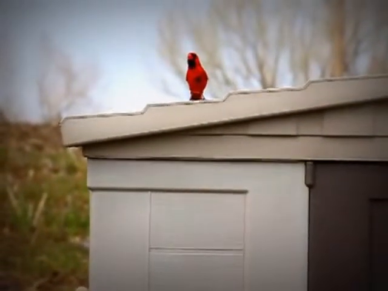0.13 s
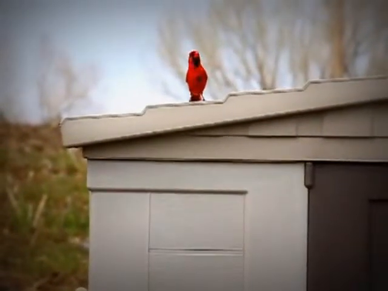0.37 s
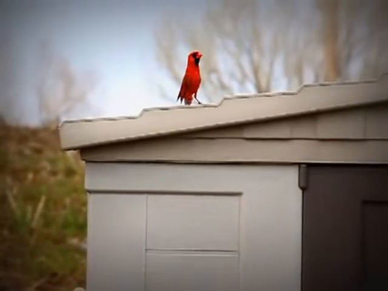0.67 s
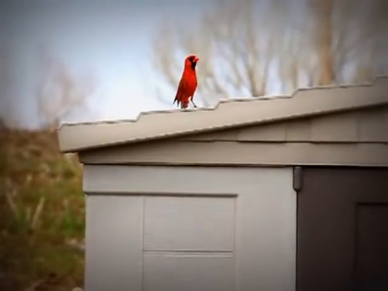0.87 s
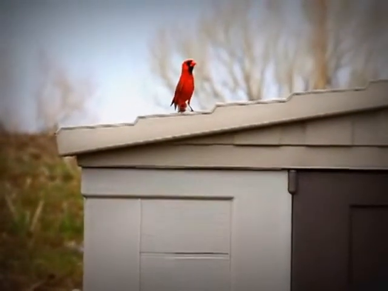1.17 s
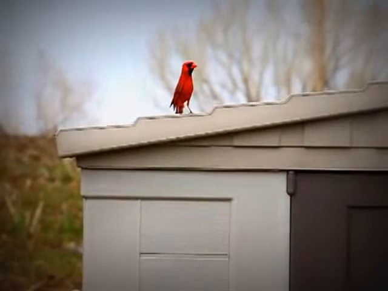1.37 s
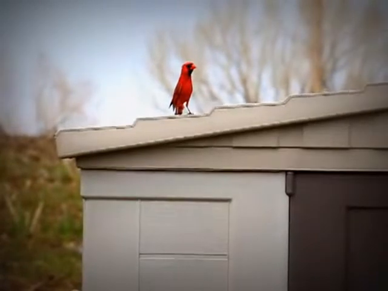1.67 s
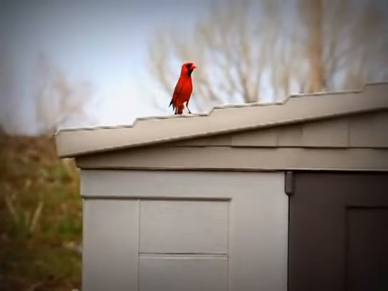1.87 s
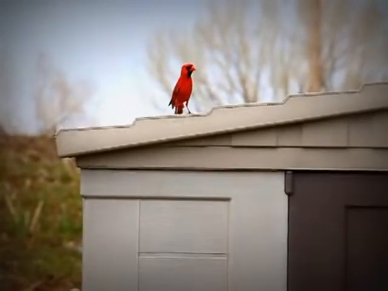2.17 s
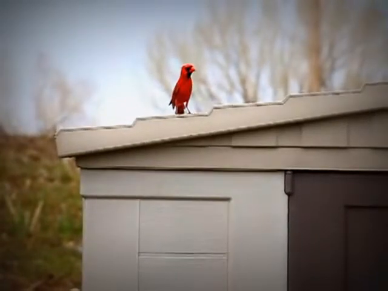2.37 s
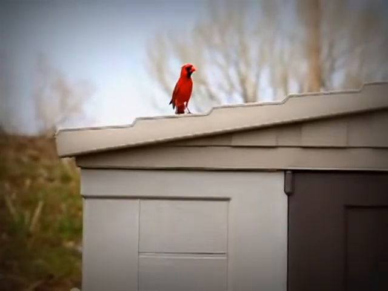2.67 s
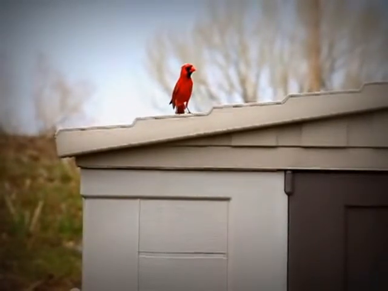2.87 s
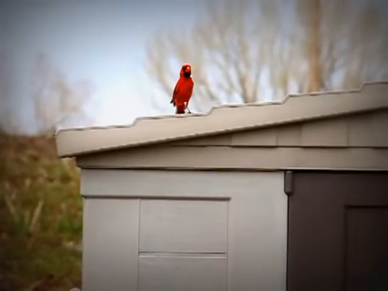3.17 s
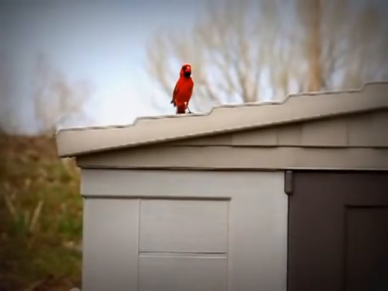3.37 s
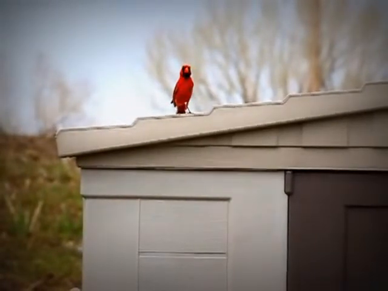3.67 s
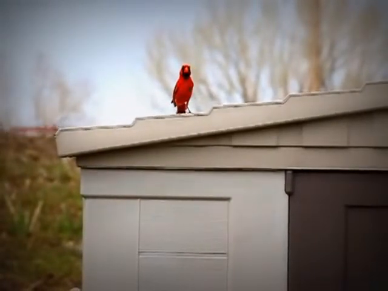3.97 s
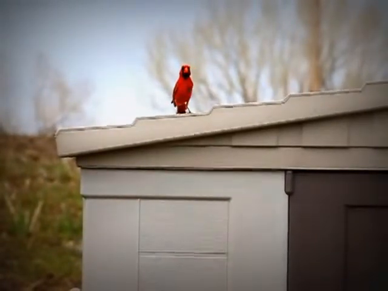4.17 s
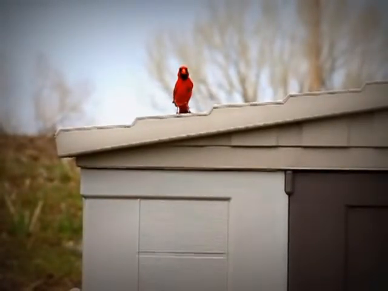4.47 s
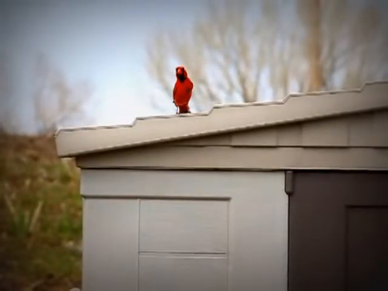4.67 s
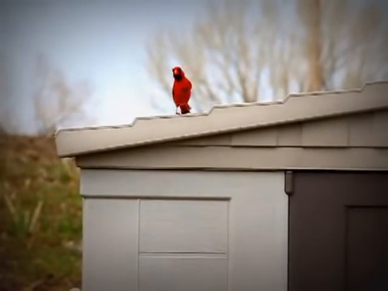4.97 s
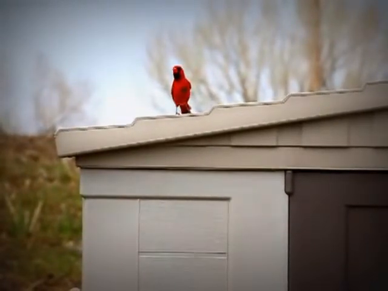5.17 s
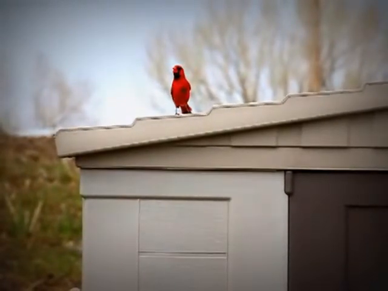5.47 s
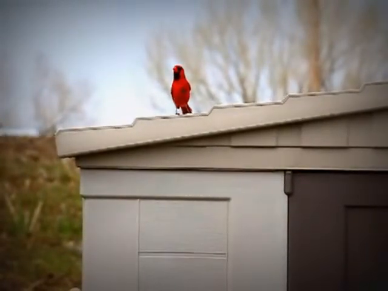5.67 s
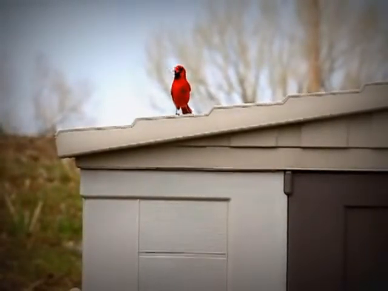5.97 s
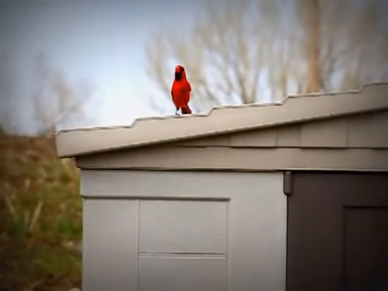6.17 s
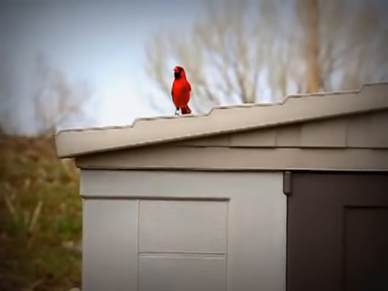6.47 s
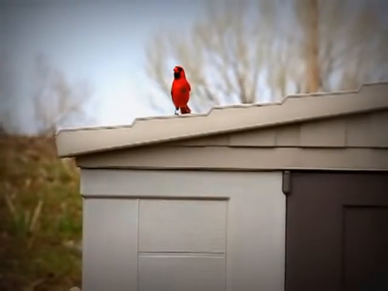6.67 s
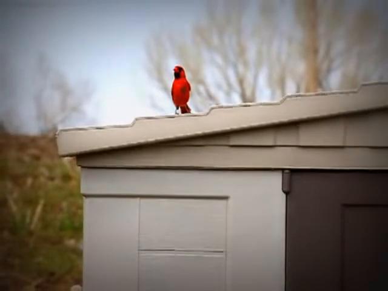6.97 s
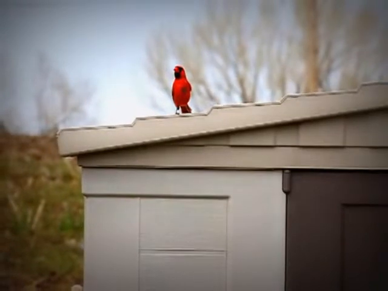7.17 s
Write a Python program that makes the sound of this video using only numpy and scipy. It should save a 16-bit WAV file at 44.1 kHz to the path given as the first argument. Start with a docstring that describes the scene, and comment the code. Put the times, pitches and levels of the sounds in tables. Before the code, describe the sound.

In a rural yard, a cardinal sings two phrases of sharp, falling whistles several seconds apart, close to the microphone and thrown back lightly by nearby walls. Scratchy sparrow chirps and a few mellow robin warbles come from further away. A faraway truck rumbles low throughout, growing louder midway as it accelerates, while a soft wash of road noise builds over the still air.

```python
"""Cardinal in a rural yard

A cardinal whistles from a shed roof: a low arch, a quick rise and a steep down-slur, over and over.
The shed and nearby walls throw the notes back. Further off, sparrows chirp, a robin warbles and a thin
bird buzzes, each note a gliding near sine from the syrinx. A distant truck pulls away through two gear
changes, its exhaust droning with the revs, while road noise slowly swells over still air and a faint hum."""
import sys
import numpy as np
from scipy import signal
from scipy.io import wavfile
from scipy.ndimage import uniform_filter1d

SR = 44100
rng = np.random.default_rng(int(sys.argv[2]) if len(sys.argv) > 2 else 0)


def persist_wave(psi):
    """Save psi, clipped to +-1, as 16-bit WAV."""
    counts = np.round(np.clip(psi, -1, 1) * 32767).astype(np.int16)
    wavfile.write(sys.argv[1], SR, np.atleast_2d(counts).T)


N = 323253
TIME = np.arange(N) / SR


def amp(db):
    return 10 ** (np.asarray(db) / 20)


def unit_rms(x):
    return x / np.sqrt(np.mean(x ** 2) + 1e-20)


def automation(points):
    """A curve of (time, value) points, drawn over the whole scene."""
    return np.interp(TIME, *np.transpose(points))


def curve_at(points, hz):
    """A curve of (frequency, value) points, joined by straight lines on a log-frequency axis."""
    point_hz, value = np.transpose(points)
    return np.interp(np.log(hz + 1), np.log(point_hz), value)


def add(mix, s, sound):
    """Lays a sound into the mix at s seconds."""
    start = round(s * SR)
    sound = sound[max(-start, 0):]
    part = mix[max(start, 0):][:len(sound)]
    part += sound[:len(part)]


def drift(t, rate_hz):
    """Smooth random modulation of rms about 1, moving no faster than the given rate."""
    hz = np.geomspace(rate_hz / 10, rate_hz, 20)[:, None]
    return np.sin(2 * np.pi * (hz * t + rng.random(hz.shape))).sum(0) / np.sqrt(10)


def wander(rate_hz):
    """A slow drift that lasts the whole scene."""
    coarse_time = TIME[::200]
    return np.interp(TIME, coarse_time, drift(coarse_time, rate_hz))


def noise(colour, patchy_db):
    """Coloured noise of rms 1, with drifting patches in time and frequency."""
    hz = np.fft.rfftfreq(2048, 1 / SR)
    real, imag, patches = rng.standard_normal((3, N // 512 + 5, len(hz)))
    patches = uniform_filter1d(patches, size=7, axis=0)
    patches = unit_rms(uniform_filter1d(patches, size=20, axis=1))
    frames = (real + 1j * imag) * amp(curve_at(colour, hz) + patchy_db * patches)
    return unit_rms(signal.istft(frames.T, nperseg=2048, noverlap=1536)[1][:N])


def note(name, db, pitch, length, overtones_db, waver, waver_hz):
    """The syrinx glides along one contour as a near sine; throat and beak colour its weak overtones."""
    # each kind of note, before transposing and stretching: (time [s], pitch [Hz], level [dB])
    contours = { "arch": [(0, 1810, -13), (.012, 1986, -8.5), (.028, 2130, 0.5), (.044, 2220, -0.5),
                (.058, 2116, 1), (.07, 1817, -4), (.088, 1650, -12), (.1, 1690, -5.5)],
                "rise": [(0, 2150, -43), (.003, 2810, 1), (.007, 3320, 1), (.012, 3820, 1),
                (.017, 3610, -1.5), (.021, 3140, -20), (.025, 2600, -28)], "slur": [(0, 7500, -20),
                (.002, 6700, -11.5), (.0045, 5250, -4), (.007, 4330, 1.5), (.011, 4150, 0.5),
                (.018, 4170, -2.5), (.026, 4150, -4.5), (.031, 4080, -22)], "fall": [(0, 2820, -33),
                (.004, 2655, 8), (.018, 2517, 2.5), (.032, 2164, 1.5), (.044, 2060, -6), (.055, 2030, -25)],
                "warble": [(0, 2975, -5), (.015, 2840, 3), (.06, 1900, -3), (.078, 2080, -2.5),
                (.12, 3005, 3.5), (.17, 1920, 4), (.192, 2020, -2), (.22, 2724, 1.5), (.235, 2700, -14)],
                "hook": [(0, 1900, -24), (.005, 2920, -5.5), (.011, 3370, -10), (.03, 3350, -11),
                (.042, 3240, 0), (.049, 2685, -1), (.057, 3030, -3), (.064, 2680, -1), (.068, 2500, -12)],
                "level": [(0, 1956, -14), (.008, 2018, -0.5), (.032, 2082, 4), (.052, 1930, -7),
                (.066, 1780, -16)], "swoop": [(0, 2070, -5), (.015, 2643, 1), (.03, 2950, 6),
                (.055, 2730, -3), (.075, 2586, -2.5), (.115, 2500, -6), (.145, 2660, -4), (.17, 2560, -9)],
                "glide": [(0, 3300, 3), (.006, 3110, 2.5), (.022, 2446, -6), (.045, 2256, 1.5),
                (.062, 2260, -2), (.072, 2273, -23)], "chirp": [(0, 3900, -18), (.012, 4250, -3),
                (.022, 4680, 0), (.04, 4740, 1), (.055, 4680, 0), (.061, 3800, 0), (.07, 3400, -7),
                (.079, 3900, -4), (.088, 3300, -15)], "overvoice": [(0, 4720, 8), (.006, 5260, 1),
                (.03, 5310, 1.5), (.04, 5100, 3), (.046, 4600, -16)], "scratch": [(0, 3400, -1),
                (.01, 4300, 2.5), (.017, 5000, 2.5), (.023, 3900, 2.5), (.031, 4500, -5.5),
                (.045, 3830, 4.5), (.058, 3760, -24)], "dip": [(0, 3260, -18), (.007, 3470, 4),
                (.014, 3410, 2), (.021, 2795, 0.5), (.028, 2836, -2), (.033, 2950, -18)],
                "hold": [(0, 3400, -2), (.01, 3380, -1), (.028, 3350, 3), (.04, 3180, -4), (.05, 2850, -2),
                (.058, 2900, -18)], "pip": [(0, 5320, -18), (.003, 4800, -1), (.007, 4565, 6),
                (.02, 4556, 0.5), (.028, 4520, -14), (.033, 4460, -26)], "lift": [(0, 2315, -8),
                (.02, 2520, -2.5), (.045, 2706, 3.5), (.062, 2560, -6), (.078, 1980, 2), (.086, 1895, -23)],
                "buzz": [(0, 6830, -18), (.01, 6750, 3), (.035, 6630, -8), (.06, 6650, -0.5),
                (.08, 6600, -11)], "peep": [(0, 3940, 1), (.008, 4470, 1.5), (.02, 4530, 0),
                (.032, 4300, -5.5), (.042, 3660, 1.5)], }
    # the syrinx's overtones: (harmonic number, level [dB])
    overtones = [(2, -18), (3, -18), (4, -10), (5, -24), (6, -18.5), (7, -25)]
    # throat and beak resonances: (frequency [Hz], gain [dB])
    beak = [(3000, -9), (4400, 0), (6400, -18), (7600, -8), (8700, -3), (10300, -9), (12400, -3.5),
            (14000, -21), (16000, -14)]
    s, contour_hz, contour_db = np.transpose(contours[name])
    t = np.arange(0, s[-1] * length, 1 / SR)
    hz = uniform_filter1d(np.interp(t, s * length, contour_hz), size=110) * pitch
    hz *= 1 + waver * drift(t, waver_hz)
    phase = 2 * np.pi * np.cumsum(hz) / SR
    upper = sum(amp(k_db + curve_at(beak, k * hz)) * (k * hz < SR / 2) * np.sin(k * phase)
                for k, k_db in overtones)
    envelope = amp(db + np.interp(t, s * length, contour_db)) * signal.windows.tukey(len(t), .04)
    return np.sqrt(2) * envelope * (np.sin(phase) + amp(overtones_db) * upper)


def sing(song, waver, waver_hz):
    """Plays a list of (time [s], note, level [dB], pitch factor, length factor, overtones [dB])."""
    out = np.zeros(N)
    for s, *syllable in song:
        add(out, s, note(*syllable, waver, waver_hz))
    return out


def walls(x):
    """Distinct early echoes from the ground and buildings."""
    # slap echoes: (delay [s], level [dB])
    echoes = [(0.0171, -9), (0.019, -15), (.022, -21)]
    out = np.zeros(N)
    for delay, db in echoes:
        add(out, delay, amp(db) * x)
    return out


def yard(x, early_db, early_t60):
    """Scatter from grass, fences and trees: a short dense cluster, then a thin long tail."""
    # how long the tail rings: (frequency [Hz], time to fall 60 dB [s])
    tail_t60 = [(1500, .45), (2200, .7), (3000, .55), (4300, .52), (8000, .35), (15000, .25)]
    hz, s, frames = signal.stft(rng.standard_normal(SR), SR, nperseg=256)
    decay = amp(-60 * s / curve_at(tail_t60, hz)[:, None]) + amp(early_db - 60 * s / early_t60)
    fade_in = np.minimum(TIME[:SR] / .004, 1)
    response = signal.istft(frames * decay, SR, nperseg=256)[1][:SR] * fade_in
    return signal.fftconvolve(x, response / np.linalg.norm(response))[:N]


def cardinal():
    """Close, clean whistles with a slap from the walls; each syllable is three notes around a rise."""
    # full syllables of arch, rise and slur: (time of rise [s], arch pitch factor, arch length factor,
    # arch overtones [dB], slur level [dB], pitch factor of rise and slur, slur length factor)
    cheers = [(.066, .97, .93, -2, -21.5, 1.012, 1.1), (.3125, 1, 1, -1, -22.5, 1, 1.05),
              (.5745, .98, 1, .5, -29.5, .99, .75), (5.5815, 1.02, 1, -3.5, -23, 1.043, 1.08),
              (5.8335, 1.01, 1.04, -1, -24.5, 1.02, 1), (6.0845, 1, 1, 1.5, -22.5, .977, .8),
              (6.321, 1.04, .9, 0, -21, .972, .83)]
    # warm-up syllables of fall, higher rise and pip:
    # (time of rise [s], level [dB], fall length factor, overtones of fall and pip [dB])
    openers = [(4.901, -33.5, .85, -11), (5.322, -29.5, 1.03, -7.5)]
    arch_db, rise_db, rise_length, rise_overtones_db = -29, -28, .91, -6
    song = []
    for s, db, fall_length, overtones_db in openers:
        song += [(s - .065 * fall_length, "fall", db, .985, fall_length, overtones_db),
                 (s, "rise", db, 1.062, rise_length, rise_overtones_db),
                 (s + .0295, "pip", db + 2, .993, .76, overtones_db)]
    for s, arch_pitch, arch_length, overtones_db, slur_db, pitch, slur_length in cheers:
        song += [(s - .121 * arch_length, "arch", arch_db, arch_pitch, arch_length, overtones_db),
                 (s, "rise", rise_db, .99 * pitch, rise_length, rise_overtones_db),
                 (s + .0255, "slur", slur_db, pitch, slur_length, -1.5)]
    voice = sing(song, waver=.0022, waver_hz=152)
    return amp(-2.5) * voice + walls(voice) + amp(-8) * yard(voice, early_db=2, early_t60=.13)


def sparrow_notes():
    """The sparrows' calls as two lists of notes, the clear and the rasping."""
    # single peeps: (time [s], level [dB], pitch factor, length factor)
    peeps = [(.25, -46, 1.22, 0.96), (.552, -43.5, 1.25, 1.3), (.948, -44, 1.02, 1.03),
             (1.477, -51, 0.9, 0.78), (1.99, -44, .99, 0.92), (2.04, -51.5, 1.05, 1.3),
             (2.186, -50.5, 0.87, 1.3), (2.233, -43.5, 0.75, 0.96), (2.893, -47, 1.02, 1.1),
             (3.866, -42, 1, .75), (4.378, -35, .76, 1), (4.505, -36.5, 0.86, 1), (5.925, -34, 0.69, 1.05),
             (6.582, -43.5, .97, 0.8)]
    # two-voiced chirps: (time [s], level [dB], pitch factor, length factor, overtones [dB])
    chirps = [(-.012, -30.5, 0.93, 1.04, -8), (2.571, -32, .98, 0.97, -6), (4.392, -27.5, .97, 1.03, -5.5),
              (5.853, -28.5, 0.94, 0.79, -4)]
    # scratches that settle on a lower note: (time [s], level [dB], pitch factor, lisp level [dB],
    # overtones [dB], last note, its level [dB], its pitch factor)
    chirrups = [(0.175, -38, .97, -55, -12, "hold", -40, .91),
                (.793, -40.5, .95, -62, -8, "hold", -38, 0.99),
                (1.64, -39, 1.04, -46, -2, "dip", -34.5, 0.96),
                (2.685, -35, 0.93, -58, -5, "hold", -35, 1.02),
                (3.562, -38, 1.02, -47.5, -1, "dip", -34, .95),
                (6.793, -38, 0.97, -58, -1, "hold", -35, 1.04)]
    # high peeps: (time [s], clear level [dB], raspy level [dB], pitch factor, lisp level [dB])
    tseeps = [(1.408, -45, -54, 1.27, -54), (3.888, -47, -44, 1.21, -51.5),
              (4.945, -53, -35.5, 1.12, -50.5), (6.51, -50, -60, 1.24, -57)]
    peep_overtones_db, tseep_length = -16, 1.25

    def lisp(s, db, pitch=1.58, overtones_db=peep_overtones_db):
        """The thin rasp just ahead of a call."""
        return s - .038, "peep", db, pitch, 1.3, overtones_db

    clear = [(s, "peep", db, pitch, length, peep_overtones_db) for s, db, pitch, length in peeps]
    rasping = []
    for s, db, pitch, length, overtones_db in chirps:
        upper_s, bright_db = s + .021, overtones_db + 6.5  # the second voice and its grit join late
        clear += [(s, "chirp", db, pitch, length, overtones_db),
                  (upper_s, "overvoice", db - 5.5, 1, length, bright_db)]
        rasping += [lisp(s, db - 22.5), (upper_s, "peep", db - 4.5, 1.05, length, bright_db)]
    for s, db, pitch, lisp_db, overtones_db, last, last_db, last_pitch in chirrups:
        rasping += [lisp(s, lisp_db, 1.33, overtones_db), (s, "scratch", db, pitch, 1, overtones_db)]
        clear += [(s + .053, last, last_db, last_pitch, 1, -15)]
    for s, clear_db, raspy_db, pitch, lisp_db in tseeps:
        clear += [(s, "peep", clear_db, pitch, tseep_length, peep_overtones_db)]
        rasping += [lisp(s, lisp_db), (s, "peep", raspy_db, pitch, tseep_length, -2)]
    return clear, rasping


def sparrows():
    """Scratchy two-voiced chirps stay fairly crisp, while the rasps waver fast and wide; the walls and yard
    echo both alike."""
    clear, rasping = sparrow_notes()
    chirps = sing(clear, waver=.014, waver_hz=550)
    rasps = sing(rasping, waver=.065, waver_hz=800)
    flock = chirps + rasps
    reflections = amp(-5.5) * walls(flock) + amp(-5) * yard(flock, early_db=-1.5, early_t60=.13)
    return amp(-2.5) * chirps + amp(-4.5) * rasps + reflections


def driving():
    """Shaft speed [Hz], relative throb [dB] and coasting (0-1): revs climb in gear and sink between."""
    # one pull in each gear: (start [s], end [s], first shaft speed [Hz], last shaft speed [Hz])
    gears = [(0, 1.44, 19.4, 25.2), (2.2, 6.08, 17.6, 27.7), (6.58, 7.33, 21.2, 21.8)]
    # the exhaust's throb against the firing tone, gear by gear: (level [dB])
    gear_throb_db = [-17.5, -8.5, -6]
    throttle_s, coast_throb_db = .12, -16.0
    easing = .11  # the revs climb a little faster at the start of a pull
    shaft_hz = np.interp(TIME, np.ravel([g[:2] for g in gears]), np.ravel([g[2:] for g in gears]))
    coasting, labour_db = np.ones(N), np.full(N, coast_throb_db)
    for (start, end, low_hz, high_hz), throb_db in zip(gears, gear_throb_db):
        pulling = (TIME >= start) & (TIME <= end)
        progress = (TIME[pulling] - start) / (end - start)
        shaft_hz[pulling] += easing * (high_hz - low_hz) * progress * (1 - progress)
        coasting[pulling], labour_db[pulling] = 0, throb_db
    coasting, labour_db = uniform_filter1d([coasting, labour_db], size=round(throttle_s * SR))
    return shaft_hz, labour_db, coasting


def truck():
    """The exhaust drones on the fifth shaft order; uneven cylinders add other orders around it."""
    # how loud the drone arrives: (time [s], level [dB])
    drone_level = [(0, -37), (1, -35), (2.2, -38), (2.75, -34.5), (3.33, -35.5), (3.55, -29), (4.25, -25.5),
                   (4.8, -25.5), (5.35, -27.5), (5.9, -27.5), (6.7, -31.5), (7.33, -27.5)]
    # brief dips in the firing tone: (time [s], depth [dB], half width [s])
    dips = [(1.49, 13, 0.056), (1.98, 7.5, 0.072), (3.87, 15, 0.087), (4.53, 11, 0.071), (5.06, 7.5, .07),
            (6.581, 10, 0.045), (6.971, 7.5, 0.18)]
    # tones beside the firing tone, stronger with the throttle shut: (shaft order, level [dB])
    uneven_orders = [(2, -25.5), (3, -28), (4, -12.5), (6, -14)]
    # the throb of pulling at low revs: (shaft order, level [dB])
    throb_orders = [(7, -1), (8, -14.5), (9, -16), (10, -29), (11, -21)]
    # growl tones, which swell as they cross the pipe's resonances: (shaft order, level [dB])
    growl_orders = [(8, -4), (9, -2), (10, -0.5), (11, -4), (12, -2), (13, -6), (14, -8), (16, 0), (18, -7)]
    # the growl's rise and fall: (time [s], level [dB])
    growl_level = [(0, -63), (2.8, -59.5), (3.6, -53), (4.4, -50.5), (5, -50.5), (6.4, -58), (6.9, -53.5),
                   (7.33, -55)]
    # the exhaust pipe's resonances: (frequency [Hz], gain [dB])
    pipe = [(140, -1), (220, -8), (270, -3.5), (320, -4.5), (355, -1), (385, 0.5), (415, -7.5), (520, 1)]
    # the colour of the engine's rumble: (frequency [Hz], relative density [dB])
    rumble_colour = [(20, -45), (33, -50), (50, -1), (75, 1), (110, 3), (160, -6), (230, -27), (400, -22),
                     (900, -64)]
    firing_order, overrun_db, smooth_shaft_hz = 5, 5, 23.25
    shaft_hz, labour_db, coasting = driving()
    turns = np.cumsum(shaft_hz) / SR
    excess_hz = shaft_hz - smooth_shaft_hz  # with higher revs the throb dies and the rumble grows
    drone_db, growl_db = automation(drone_level), automation(growl_level)
    throb_db = drone_db + labour_db - np.clip(5 * excess_hz, 0, 20)
    dip_db = sum(depth_db * np.exp(-((TIME - s) / width) ** 2) for s, depth_db, width in dips)

    def tone(order, db, flutter_db):
        """One shaft order, fluttering with the moving air on its long path."""
        envelope = amp(db + flutter_db * wander(9))
        return np.sqrt(2) * envelope * np.sin(2 * np.pi * (order * turns + rng.random()))

    firing = tone(firing_order, drone_db - dip_db, flutter_db=1.24)
    uneven = sum(tone(k, db + drone_db + overrun_db * coasting, flutter_db=2.5)
                 for k, db in uneven_orders)
    throb = sum(tone(k, db + throb_db, flutter_db=2) for k, db in throb_orders)
    growl = sum(tone(k, db + growl_db + curve_at(pipe, k * shaft_hz), flutter_db=3)
                for k, db in growl_orders)
    rumble = amp(-44.5 + .6 * excess_hz) * noise(rumble_colour, patchy_db=1.5)
    return firing + uneven + throb + growl + rumble


def hum():
    """A faint far tone that wavers a little."""
    # it sinks away, then creeps back: (time [s], level [dB])
    hum_level = [(0, -58), (2.3, -55.5), (3.2, -77), (7.33, -50)]
    hz = 209 * (1 + .0037 * wander(3))
    return np.sqrt(2) * amp(automation(hum_level)) * np.sin(2 * np.pi * np.cumsum(hz) / SR)


def outdoors():
    """A bed of still air and far tyre hum, under road noise that swells."""
    # the broad hush of open air: (frequency [Hz], relative density [dB])
    air_colour = [(120, -52), (200, -9.5), (263, -5), (339, -2), (392, -4.5), (479, -6), (607, -9),
                  (827, -3), (1380, -5), (2510, -12.5), (2960, -14), (3750, -16.5), (4660, -17.5),
                  (5590, -22), (15500, -37)]
    # the narrow hum of far tyres: (frequency [Hz], relative density [dB])
    tyre_colour = [(500, -64), (740, -21), (850, 3), (980, -13), (1400, -34.5)]
    # the wash of road noise: (frequency [Hz], relative density [dB])
    road_colour = [(120, -11), (200, -4.5), (273, -11), (392, -11), (525, -11.5), (1090, -9.5), (1590, -15),
                   (3680, -15), (6020, -23.5), (6590, -26), (8050, -36.5), (15500, -56)]
    # the road's swell: (time [s], level [dB])
    road_level = [(0, -58), (2.6, -55), (3.4, -47.5), (4.2, -42.5), (5.2, -44), (5.9, -39), (6.4, -42),
                  (6.65, -46.5), (6.95, -38.5), (7.33, -37.5)]
    air = amp(-46.5) * noise(air_colour, patchy_db=.6)
    tyres = amp(-52) * noise(tyre_colour, patchy_db=0)
    road = amp(automation(road_level)) * noise(road_colour, patchy_db=2.5)
    return air + tyres + road


def robin():
    """Low, mellow warbles from the trees."""
    # its song: (time [s], note, level [dB], pitch factor, length factor, overtones [dB])
    song = [ (1.652, "warble", -43, 1.03, 1.04, -24), (2.18, "level", -49.5, 0.94, 1.33, -20),
            (2.295, "lift", -41, 1, 1.01, -20), (4.108, "warble", -38.5, 1, 1, -28),
            (4.566, "level", -38.5, .98, 0.56, -20), (4.595, "swoop", -35, 0.99, 0.91, -26),
            (4.775, "level", -42, 1.11, 0.87, -21), (4.985, "hook", -27, 1.033, 0.96, -24),
            (5.056, "level", -32.5, 0.99, 1, -25), (5.134, "hook", -29.5, 0.99, 1, -20),
            (5.18, "level", -39, 1.09, 1.2, -15), (5.202, "level", -33.5, 0.99, 1.18, -20),
            (5.543, "level", -36.5, 1.36, 0.66, -20), (5.583, "level", -28.5, 1.32, 0.63, -18),
            (5.616, "glide", -29, 0.98, 1.1, -24)]
    voice = sing(song, waver=.0021, waver_hz=115)
    return amp(-.5) * voice + amp(1) * walls(voice) + amp(-9) * yard(voice, early_db=4, early_t60=.073)


def thin_bird():
    """A high, far buzz whose fast beating throws side tones above and below it."""
    # its buzzes: (time [s], note, level [dB], pitch factor, length factor, overtones [dB])
    song = [(6.845, "buzz", -49.5, 0.92, 1, -20), (6.945, "buzz", -48, 0.96, 0.84, -12.5),
            (7.07, "buzz", -47, 1, 1, -20), (7.195, "buzz", -48, 1.01, 1, -12)]
    beat_hz, beat_depth = 2300, .33
    voice = sing(song, waver=.013, waver_hz=392)
    voice *= 1 + beat_depth * np.sin(2 * np.pi * beat_hz * TIME)
    return amp(-.5) * voice + amp(-6) * yard(voice, early_db=5, early_t60=.15)


def scene():
    """Birds, truck and open air at one microphone."""
    birds = cardinal() + robin() + sparrows() + thin_bird()
    return (birds + truck() + hum() + outdoors())[None]


def record(dry):
    """The microphone loses the deepest bass, and the recorder cuts the very top."""
    low_cut_hz, high_cut_hz = 36, 15800
    low_cut = signal.butter(4, low_cut_hz, "highpass", fs=SR, output="sos")
    high_cut = signal.firwin(511, high_cut_hz, window=("kaiser", 9), fs=SR)
    return signal.oaconvolve(signal.sosfilt(low_cut, dry), high_cut[None], "same")


dry = scene()
out = record(dry)
persist_wave(out)
```